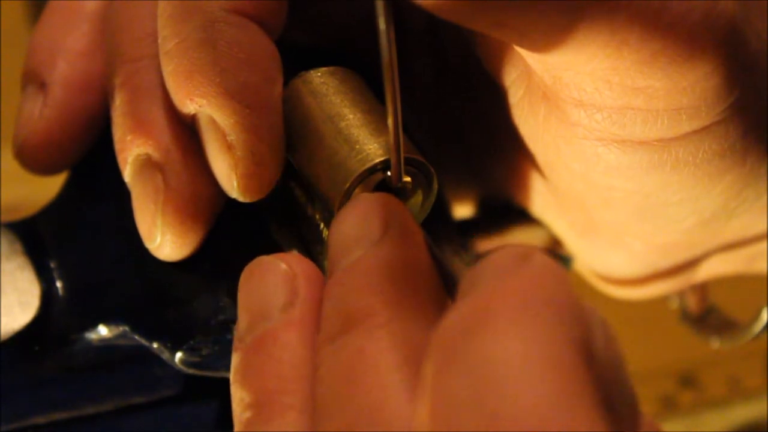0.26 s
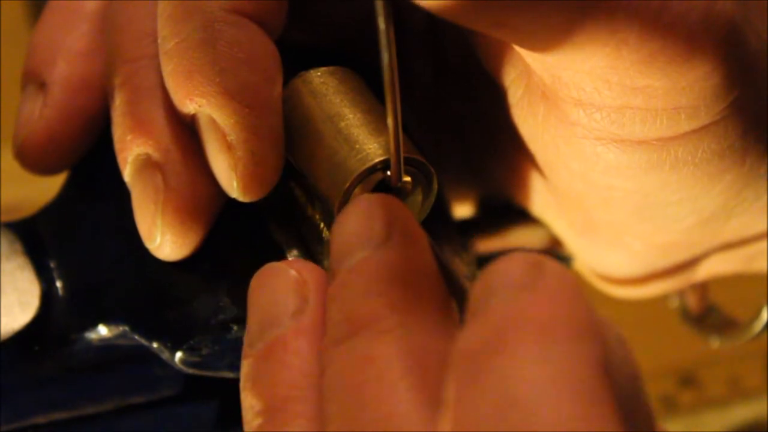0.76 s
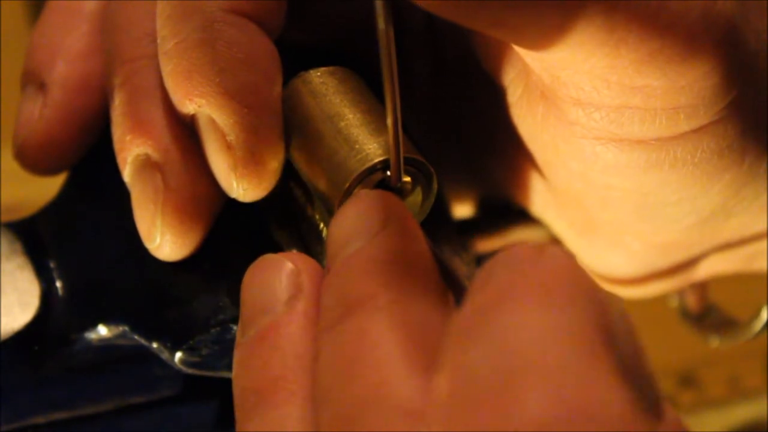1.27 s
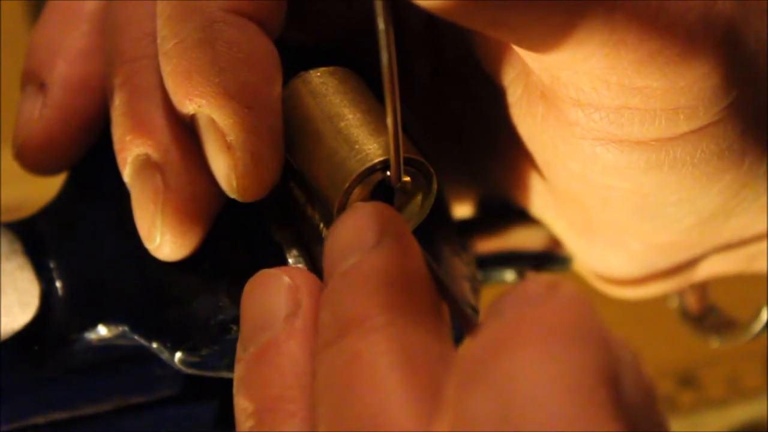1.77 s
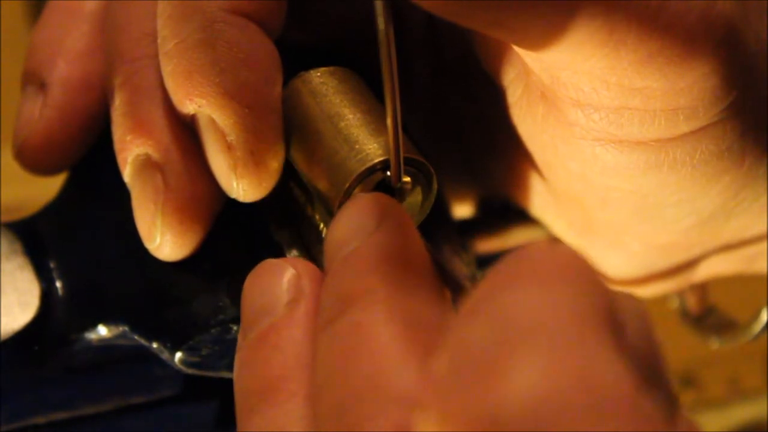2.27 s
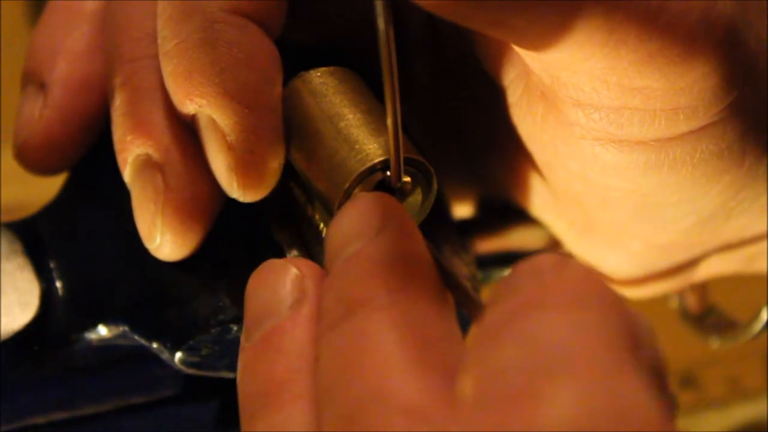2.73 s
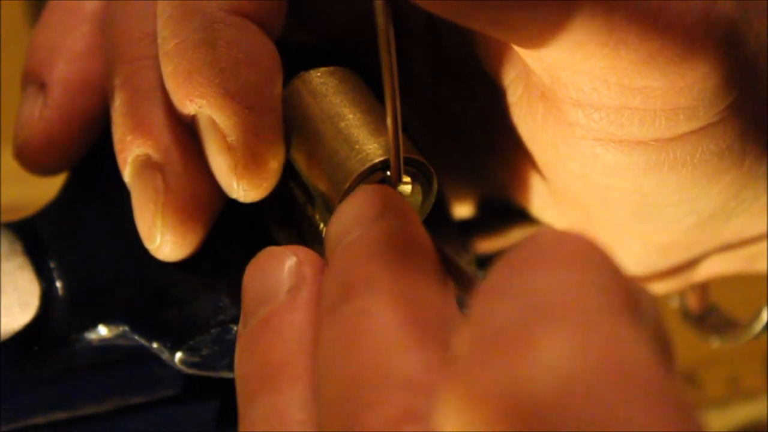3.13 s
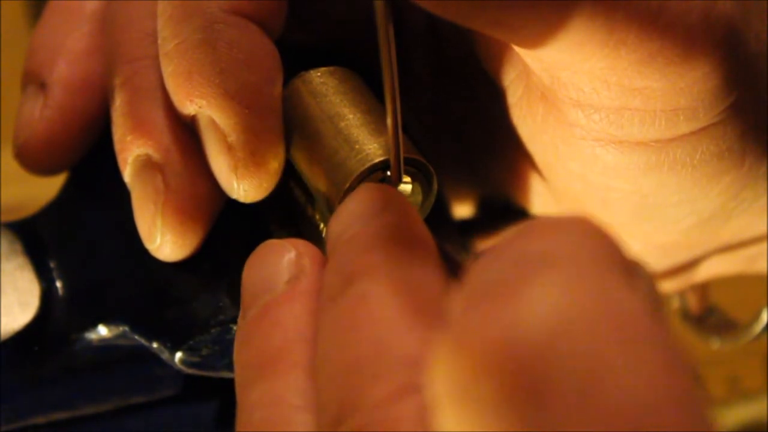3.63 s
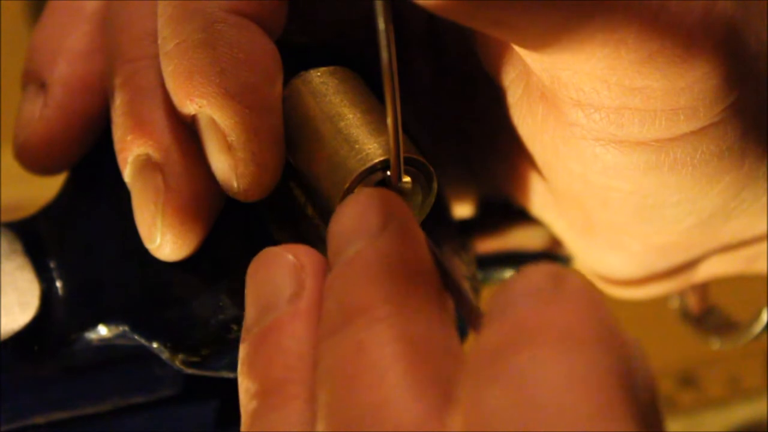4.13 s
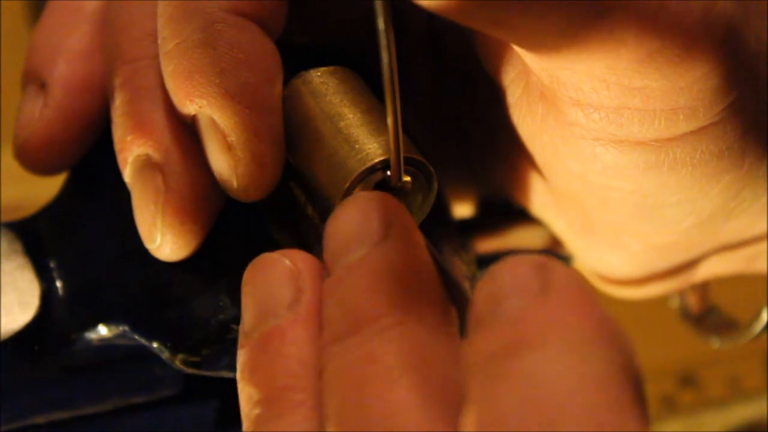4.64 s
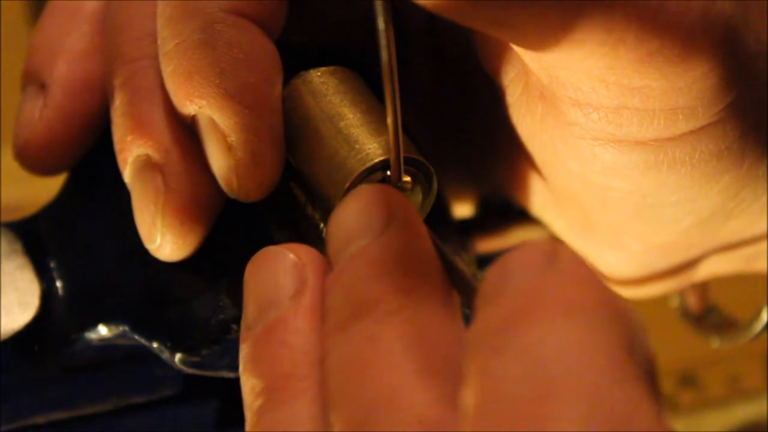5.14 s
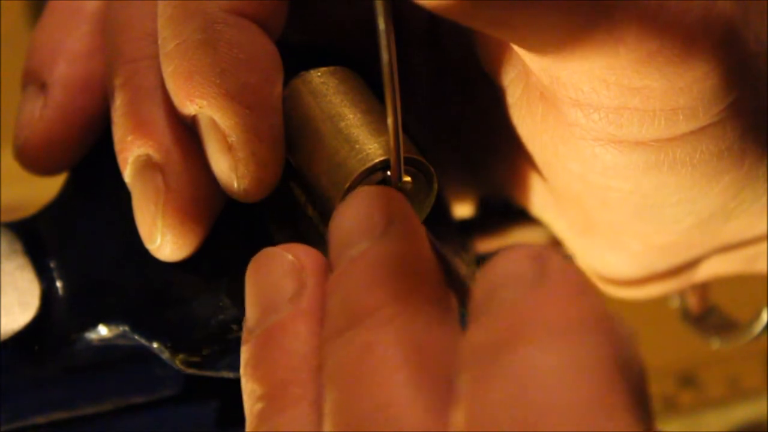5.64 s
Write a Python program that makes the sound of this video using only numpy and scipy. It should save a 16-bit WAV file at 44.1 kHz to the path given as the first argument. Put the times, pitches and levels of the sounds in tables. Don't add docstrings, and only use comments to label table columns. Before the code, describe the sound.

Very close in a small quiet room, a thin steel pick works a small brass lock. A sharp bouncing snap comes early, then a softer rattle, a tiny squeak and scattered faint ticks. Past the middle a hard double snap knocks the lock's holder on the bench, followed by more light ticks. A low, steady fan hum and soft hiss run throughout.

```python
import sys
import numpy as np
from scipy import signal
from scipy.fft import rfft, irfft
from scipy.io import wavfile
from scipy.ndimage import uniform_filter1d

SR = 44100
rng = np.random.default_rng(int(sys.argv[2]) if len(sys.argv) > 2 else 0)


def volts_from_db(level):
    exponent = np.asarray(level, float) / 20
    return 10 ** exponent


def store_pcm(level_fs):
    pcm = np.round(np.clip(level_fs, -1, 1) * 32767).astype(np.int16)
    wavfile.write(sys.argv[1], SR, np.atleast_2d(pcm).T)


N = 260190
TIME = np.arange(N) / SR
TOP_HZ = 15750
ROOM_PATHS = 3


def rms_one(x):
    return x / np.sqrt(np.mean(x ** 2))


def on_log_hz(table, hz):
    table_hz, value = np.transpose(table)
    return np.interp(np.log(np.maximum(hz, 1)), np.log(table_hz), value)


def walk(rate_hz):
    k = int(SR / rate_hz)
    held = np.repeat(rng.standard_normal(N // k + 1), k)
    return 1.1999 * uniform_filter1d(uniform_filter1d(held, k), k)[:N]


def air():
    # freq_hz, level_db
    flow_spectrum = [(20, -33.5), (50, -28.5), (110, -16), (180, -16), (250, -14), (330, -15.5),
                     (520, -11.5), (700, -16), (900, -20), (1500, -20), (2100, -23.5), (4000, -26),
                     (11000, -30.5), (15500, -31.5)]
    # freq_hz, width_hz, lift_db
    housing = [(266.78, 53.05, 3), (569.34, 52.65, 2), (667, 50, 1.5), (1062, 126.2, 2.5),
               (1761.4, 85.44, 4), (2421, 55.8, -2.5), (2427.6, 49.3, 1.5)]
    level_db, sideband_db, sideband_width_hz = -54.5, 8, 1.3

    hz = np.arange(N // 2 + 1) * SR / N
    db = on_log_hz(flow_spectrum, hz)
    for centre_hz, width_hz, lift_db in housing:
        db += lift_db * np.exp(-.5 * ((hz - centre_hz) / width_hz) ** 2)

    sideband_hz = 230 + np.cumsum(rng.uniform(10, 40, size=100))
    nearest = np.interp(hz, sideband_hz, np.arange(100)).round().astype(int)
    strength = rng.uniform(0.1074, 1, size=100)[nearest]
    db += sideband_db * strength * np.exp(-.5 * ((hz - sideband_hz[nearest]) / sideband_width_hz) ** 2)
    db -= 40 * (hz > TOP_HZ)

    spectrum = rfft(rng.standard_normal(N)) * volts_from_db(db)
    low = 1 / (1 + (hz / 900) ** 4)
    breathing = volts_from_db(0.2371 * walk(2.6432))
    flow = irfft(spectrum * low, N) * breathing
    hiss = irfft(spectrum * (1 - low), N)
    return volts_from_db(level_db) * rms_one(flow + hiss)


def fan_tones():
    # freq_hz, rms_db
    motor_tones = [(388.9, -73), (582.7, -73), (722.7, -76), (1079.4, -69), (1156.1, -76.5),
                   (1197.8, -83.5), (1403.7, -79), (1425.2, -87), (1514.1, -94), (1586.7, -93),
                   (1643.3, -82.5), (1715.9, -83), (1730.7, -72), (1771.1, -81.5), (1789.9, -72.5),
                   (1803.4, -79.5), (1874.7, -84.5), (1919.1, -84.5), (1938.0, -79), (2160.0, -84.5),
                   (2405.0, -82.5), (2452.1, -75), (2594.8, -86.5), (2636.5, -79)]
    blade_hz, blade_db = 330.46, -58
    coil_hz, coil_db = 11635, -79

    out = volts_from_db(blade_db + .5 * walk(2)) * np.sin(2 * np.pi * blade_hz * TIME + .3 * walk(1))
    for hz, db in motor_tones:
        level = volts_from_db(db + 2.0 * walk(4.915))
        phase = 1.0497 * walk(2.9962) + rng.uniform(0, 2 * np.pi)
        out = out + level * np.sin(2 * np.pi * hz * TIME + phase)
    whine_hz = coil_hz + 7 * walk(8) + 4 * walk(34)
    whine = np.sin(2 * np.pi * np.cumsum(whine_hz) / SR)
    out = out + volts_from_db(coil_db + 2.5 * walk(6.3)) * whine
    return np.sqrt(2) * out


def drag():
    end_s, fade_s, centre_hz, width_hz, level_db = .25, .06, 4030, 260, -72
    edges_hz = [centre_hz - width_hz / 2, centre_hz + width_hz / 2]
    band = signal.butter(2, edges_hz, "band", fs=SR, output="sos")
    hiss = rms_one(signal.sosfilt(band, rng.standard_normal(N)))
    return volts_from_db(level_db) * hiss * np.clip((end_s - TIME) / fade_s + .5, 0, 1)


def noise_fill():
    edges_hz = [4200, 5600, 6500, 8200, 9700, 11200, 12800, 14500, 16000]
    patches_per_s, level_db = 7, -62

    hz, frames, grid = signal.stft(rng.standard_normal(N), SR, nperseg=2048)
    mask = np.zeros(grid.shape)
    for at, band in rng.uniform(size=(int(patches_per_s * N / SR), 2)):
        k = int(band ** 1.5 * (len(edges_hz) - 1))
        inside = (hz > edges_hz[k]) & (hz < edges_hz[k + 1])
        mask[inside, int(at * len(frames))] = volts_from_db(-.3 * k)
    return volts_from_db(level_db) * signal.istft(grid * mask, SR, nperseg=2048)[1][:N]


def snap_contacts():
    snap_s = [
        .4362,
        .7952,
        3.6251,
        3.6504,
    ]
    # pick_db, bar_db, holder_db (re pins), pin_low_hz
    snap_paths = [(-10, -26, -38, 9881), (-13, -24, -25.5, 10126), (-8.5, -12.5, -13.5, 9986),
                  (-11.5, -25, -24, 12135)]
    # delay_ms, pin_peak_db, chatter_ms
    bounces = [
        [(0, -13, .4), (.7, -6, .15), (3., -8.5, .55), (4.9, -25, .5), (12.5, -20, .5)],
        [(0, -29, .8), (6.7, -36, .4), (8.9, -26.5, .7), (13.8, -38, .5), (15.2, -38, 1.)],
        [(.2, -17, 1.3), (5, -35, 1.5)],
        [(0, -13.5, .2), (.8, -22, .4), (5., -33, .5), (7.6, -37, .6)],
    ]
    contacts = []
    for start_s, path, rows in zip(snap_s, snap_paths, bounces):
        for delay_ms, pin_db, chatter_ms in rows:
            contacts.append((start_s + delay_ms / 1000, pin_db, *path, chatter_ms))
    return contacts


def tick_contacts(pin_low_hz):
    # start_s, pin_peak_db, pick_db, bar_db (re pins)
    ticks = [(1.536, -47.5, -6.5, -18), (1.62, -50, -3, -14), (2.2957, -39, -6, -30.5),
             (2.3975, -39.5, -3.5, -14), (2.4025, -47.5, 0.5, -7), (2.6235, -38, -10.5, -24),
             (2.625, -37, -13.5, -20.5), (3.228, -40, -14.5, -19), (3.8026, -41, -6.5, -8.5),
             (3.827, -39, 0, -6), (4.0824, -43, -9.5, -10.5), (4.127, -51.5, 1, 1.5),
             (4.212, -53, -10.5, -11), (4.328, -38, -10.5, -20.5), (4.706, -39.5, -4, -14),
             (5.3186, -44, -4, 0), (5.321, -44.5, 0.5, -4.5), (5.3249, -50.5, 3, 3.5), (5.516, -56, 3, -6),
             (5.883, -42, -20.5, -26.5)]
    holder_re_bar_db, chatter_ms = -6, .7
    return [(start_s, pin_db, pick_db, bar_db, bar_db + holder_re_bar_db, pin_low_hz, chatter_ms)
            for start_s, pin_db, pick_db, bar_db in ticks]


def chatter(grit, seconds):
    u = np.arange(len(grit)) / SR / max(seconds, 1e-4)
    shape = u * np.exp(-2 * u)
    limit = np.minimum(3 * shape / shape.max(), 1)
    burst = grit * np.abs(grit) * shape
    for _ in range(8):
        spectrum = rfft(burst)
        burst = irfft(spectrum / (np.abs(spectrum) + 1e-12), len(grit)) * limit
    return burst


def ring(modes, reach, chance, t):
    scatter_db = 2.5
    low_hz, high_hz, bare_db = reach
    count = len(modes)
    hz, db, t60_s = np.transpose(modes)[:, :, None]
    sign = (-1) ** np.arange(count)[:, None]
    share = sign * volts_from_db(db + scatter_db * chance[:count, None])
    detune = 1 + .01 * chance[-count:, None]
    decay = np.exp(-np.log(1000) * t / t60_s)
    answer = np.sum(share * decay * np.sin(2 * np.pi * hz * detune * t), axis=0)
    answer[0] = volts_from_db(bare_db) * count
    band = signal.butter(3, (low_hz, high_hz), "band", fs=SR, output="sos")
    return signal.sosfilt(band, answer)


def lock():
    # freq_hz, level_db, t60_s
    pins = [(10300, 0, .005), (11000, -2, .004), (12000, 0, .005), (12800, -1, .005), (13600, -1, .004),
            (14400, -1, .004), (15300, 1, .004)]
    pick = [(4600, -3, .005), (4950, -1, .007), (5600, 0, .006), (6160, -3, .005), (7000, -4, .004),
            (8170, 0, .006), (8700, -3, .004)]
    bar = [(2700, -1, .008), (3080, -3, .01), (3450, 0, .012), (3750, -3, .007)]
    holder = [(1024.8, -10, 0.01598), (1101.2, 10, 0.02153), (1494.7, 10.5, 0.02419), (1683.4, 7, 0.0482),
              (1984.4, 9, 0.0394), (2238.8, 2.5, 0.1401)]
    # low_hz, high_hz, bare_contact_db (re ring)
    radiation = [(10000, 18000, 10), (3900, 9000, 10), (2300, 4400, 6), (600, 2500, 3)]
    tick_patchiness, tick_bare_db = 2.2, -5

    out = np.zeros((ROOM_PATHS, N + SR))
    t = np.arange(SR // 8) / SR
    parts = (pins, pick, bar, holder)
    snaps = snap_contacts()
    contacts = snaps + tick_contacts(radiation[0][0])
    for n, (start_s, pin_db, pick_db, bar_db, holder_db, pin_low_hz, chatter_ms) in enumerate(contacts):
        light = n >= len(snaps)
        chance = rng.standard_normal((4, 14))
        chance[:, :7] *= tick_patchiness if light else 1
        force = chatter(rng.standard_normal(256), chatter_ms / 1000)
        start = int(start_s * SR)
        part_db = (0, pick_db, bar_db, holder_db)
        for k, (low_hz, high_hz, bare_db) in enumerate(radiation):
            reach = (low_hz if k else pin_low_hz, high_hz, bare_db + light * tick_bare_db)
            answer = ring(parts[k], reach, chance[k], t)
            sound = (-1) ** k * signal.fftconvolve(answer, force)[:len(t)]
            level = volts_from_db(pin_db + part_db[k])
            out[n % ROOM_PATHS, start:start + len(t)] += level * sound / np.abs(sound).max()
    return out[:, :N]


def slides():
    squeak_db = [-52, -55, -54, -70, -57]
    squeak_s, squeak_gap_s, squeak_hz, squeak_t60_s = 1.598, .021, 5390, .035
    # freq_hz, t60_s
    shaft_ring = (4950, .009)
    bar_ring = (3510, .03)
    # start_s, level_db
    shaft_plucks = [
        (3.6265, -25),
        (3.4, -39),
        (5.517, -44),
        (.796, -41),
    ]
    bar_plucks = [
        (.44, -31),
        (3.627, -35),
        (3.655, -42),
        (5.3185, -44),
        (5.336, -52),
        (5.366, -55),
    ]
    # freq_hz, level_db, t60_s
    bench = [(253.22, -5.5, 0.0862), (419.99, -0.5, 0.162), (494.7, -6.5, 0.2309), (778.54, -5.5, 0.0005),
             (858.46, -8.5, 0.2734), (1145.7, -5, 0.1369)]
    # start_s, peak_db, tilt_db_per_octave (above 430 Hz)
    knocks = [
        (.438, -68, 19),
        (3.626, -40.5, 0),
        (3.651, -43.5, -2),
        (3.659, -50.5, 2),
    ]
    onset_s = 0.0017

    rings = [(squeak_s + k * squeak_gap_s, squeak_hz, db, squeak_t60_s) for k, db in enumerate(squeak_db)]
    for (hz, t60_s), plucks in ((shaft_ring, shaft_plucks), (bar_ring, bar_plucks)):
        rings += [(start_s, hz, db, t60_s) for start_s, db in plucks]
    for start_s, db, tilt in knocks:
        rings += [(start_s, hz, db + share_db + tilt * np.log2(hz / 430), t60_s)
                  for hz, share_db, t60_s in bench]

    out, t = np.zeros(N), np.arange(SR // 8) / SR
    for start_s, hz, db, t60_s in rings:
        start = int(start_s * SR)
        envelope = np.minimum(t / onset_s, 1) * np.exp(-np.log(1000) * t / t60_s)
        out[start:start + len(t)] += volts_from_db(db) * envelope * np.sin(2 * np.pi * hz * t)
    return out


def room(x):
    # freq_hz, t60_s
    decay_t60 = [(200, 0.762), (1000, 0.2881), (4000, 0.33163), (9000, 0.2153), (16000, 0.1553)]
    level_db, onset_s = -7, .004
    hz, frames_s, grid = signal.stft(rng.standard_normal(SR // 2), SR, nperseg=128)
    decay = volts_from_db(-60 * frames_s / on_log_hz(decay_t60, hz)[:, None])
    tail = signal.istft(grid * decay, SR, nperseg=128)[1]
    tail = signal.sosfilt(signal.ellip(8, .2, 40, TOP_HZ, fs=SR, output="sos"), tail)
    tail = tail * (1 - np.exp(-np.arange(len(tail)) / SR / onset_s))
    return volts_from_db(level_db) * signal.fftconvolve(x, tail / np.sqrt(np.sum(tail ** 2)))[:N]


def scene():
    paths = [*lock(), slides()]
    mono = sum(x + room(x) for x in paths) + air() + fan_tones() + drag()
    return np.array([mono, mono])


def top_cut(x):
    return signal.sosfilt(signal.butter(12, 17140, fs=SR, output="sos"), x)


def record(dry):
    step = signal.ellip(5, .2, 24, TOP_HZ, fs=SR, output="sos")
    edge = signal.ellip(6, .2, 60, 16500, fs=SR, output="sos")
    mix = dry + [[1], [-1]] * noise_fill()
    return top_cut(signal.sosfilt(np.r_[step, edge], mix))


dry = scene()
out = record(dry)
store_pcm(out)
```